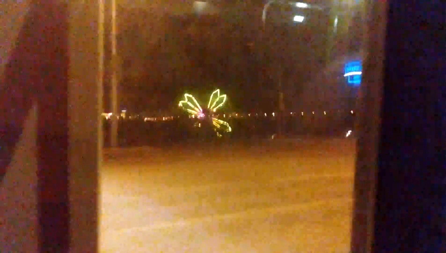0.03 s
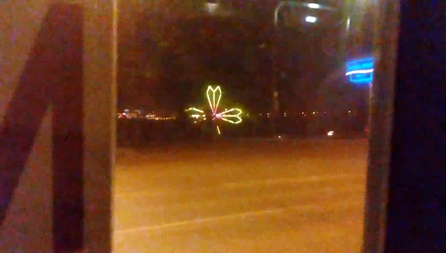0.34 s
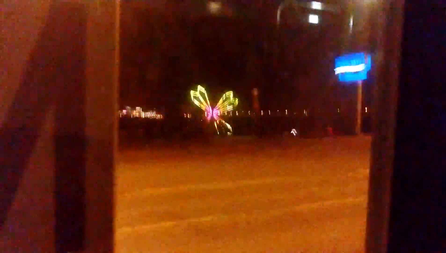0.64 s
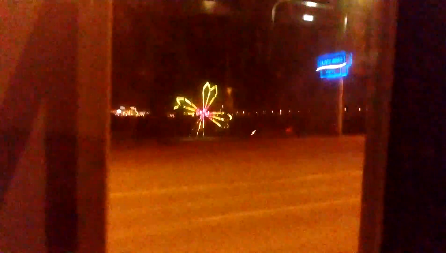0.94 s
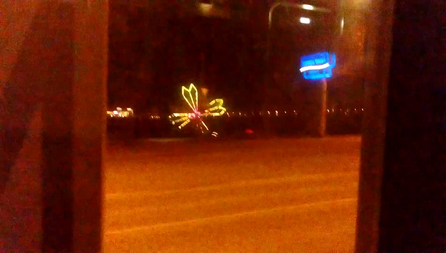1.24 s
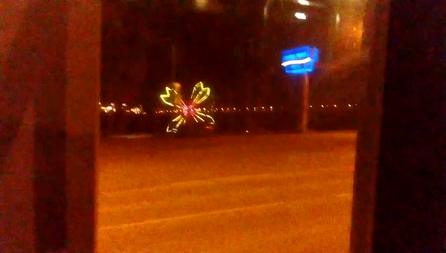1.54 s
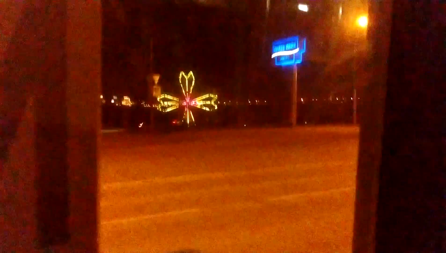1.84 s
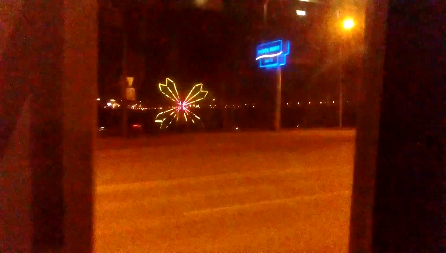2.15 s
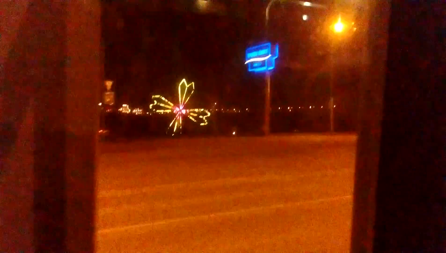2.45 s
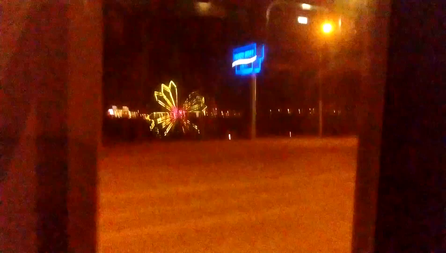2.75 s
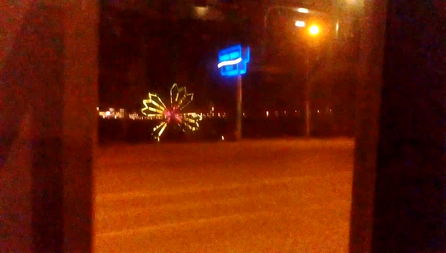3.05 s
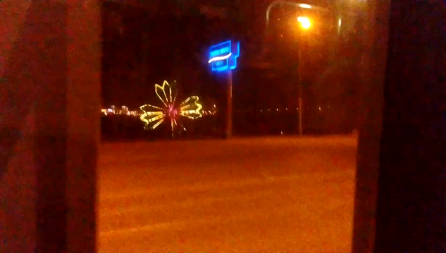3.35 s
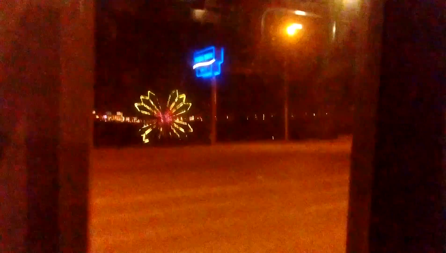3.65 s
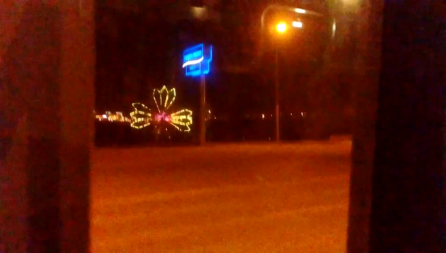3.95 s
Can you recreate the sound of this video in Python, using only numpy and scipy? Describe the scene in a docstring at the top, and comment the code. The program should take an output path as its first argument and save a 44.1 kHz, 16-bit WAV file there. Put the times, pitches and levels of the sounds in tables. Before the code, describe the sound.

Steady low road rumble and engine hum inside a moving bus, with faint rattles.

```python
"""Road rumble inside a bus rolling slowly along a night street, heard in mono from one seat.
The wheels on the uneven surface fill the cabin, which swells in short booms; the engine hums at low,
nearly steady revs. Loose trim clacks and chirps, and a few soft scuffs pass. Behind them sit tyre and
air hiss, a faint high whine and, at the end, a thin squeal. The sound fades in at the start."""
import sys
import numpy as np
from scipy import signal
from scipy.fft import rfft, irfft
from scipy.io import wavfile
from scipy.ndimage import uniform_filter1d

SR = 44100
rng = np.random.default_rng(int(sys.argv[2]) if len(sys.argv) > 2 else 0)


def generate_wav(signal):
    """Clip the signal to [-1, 1] and save it as 16-bit WAV at the path in sys.argv[1]."""
    frames = np.transpose(np.atleast_2d(signal))
    scaled = np.clip(frames, -1, 1) * 32767
    pcm = np.round(scaled).astype(np.int16)
    wavfile.write(sys.argv[1], SR, pcm)


N = 176400
T = np.arange(N) / SR


def road():
    """Rumble of the wheels, shaken by the uneven surface and heard through the cabin."""
    # rumble spectrum at the seat: frequency_hz, relative_db
    tone = [(8, -8), (26, -12), (35, -18), (50, -9), (68, -2), (95, 0), (120, -1.5), (142, -0.5), (185, -6),
            (235, -10.5), (300, -9.5), (340, -13.5), (408, -8.5), (442, -14.5), (465, -12.5), (540, -18.5),
            (600, -17), (720, -19.5), (815, -16), (885, -21.5), (935, -20), (1010, -22.5), (1130, -22.5),
            (1400, -25.5), (2150, -32), (2600, -44), (4000, -66)]
    # rise and fall of the rumble: time_s, gain_db
    swell = [(0.35, 0), (0.58, 1), (0.66, -1), (0.79, 1), (0.84, 0), (0.9, 0.5), (1.42, -0.5),
             (1.68, -0.87), (1.81, 1), (1.92, -0.5), (2.4, 0), (2.76, -1), (2.96, 1), (3.06, -1.2),
             (3.3, 0.5), (3.48, -0.1), (3.76, -1), (4, 0.5)]
    level_db = -25.5 + curve(swell) + 0.5 * wander(rate_hz=50)
    rumble = colour(patchy_noise(patch_db=1.5, frame_samples=512), tone)
    return amp(level_db) * unit(ripple(rumble, depth_db=0.8))


def booms():
    """Low tones of the cabin swell and die away, gliding slightly in pitch."""
    # cabin booms: start_s, length_s, from_hz, to_hz, level_db
    events = [(0.75, 0.5, 138, 135.3, -27.5), (1.356, 0.48, 133, 127.1, -30.5),
              (0.797, 0.48, 88, 93.5, -31), (1.15, 0.4, 73, 68.5, -33.5), (1.696, 0.55, 96, 93.3, -34.5),
              (1.726, 0.2, 145.4, 143, -27.5), (1.77, 0.106, 83.8, 84.5, -25),
              (1.99, 0.75, 106, 109.6, -30.5), (2.7, 0.27, 101.1, 100.4, -31.5),
              (2.948, 0.42, 73.84, 74, -30)]
    out = np.zeros(N)
    for start, length, from_hz, to_hz, db in events:
        progress = np.clip((T - start) / length, 0, 1)
        cycles = np.cumsum(from_hz + (to_hz - from_hz) * progress) / SR + rng.random()
        out += amp(db) * np.sin(np.pi * progress) * np.sqrt(2) * np.sin(2 * np.pi * cycles)
    return out


def engine():
    """The engine hums at multiples of the crankshaft speed, each wavering in strength."""
    # crankshaft speed: time_s, turns_per_s
    speed = [(0, 14.7), (0.7, 14.78), (1.3, 14.72), (1.9, 14.62), (2.4, 14.7), (3.0, 14.8), (4, 14.85)]
    # partials of the hum: cycles_per_turn, level_db
    orders = [(3, -37), (5, -39), (6, -34.5), (7, -42.5), (11, -33), (12, -40), (14, -47.5), (40, -53),
              (54, -52)]
    jitter_turns = 0.0041 * wander(rate_hz=5.2)
    turns = np.cumsum(curve(speed)) / SR + jitter_turns
    hum = np.zeros(N)
    for order, db in orders:
        strength = 1 + 0.27 * wander(rate_hz=5)
        hum += amp(db) * unit(strength * np.sin(2 * np.pi * (order * turns + rng.random())))
    return hum


def rattles():
    """Chirps, scuffs and clacks of loose fittings, coloured by the cabin's resonances."""
    return ripple(chirps() + scuffs() + clacks(), depth_db=1.5)


def clacks():
    """Loose panels knock: sharp when they hit squarely, dull when they bounce."""
    # panel knocks: start_s, level_db, brightness (sharp share of the power, 0-1)
    knocks = [(2.164, -32.5, .9), (2.168, -33, .6), (2.182, -42, .5), (2.194, -34, 0.1),
              (2.202, -32.5, .15), (2.271, -33, 0.54), (2.274, -33.5, 0), (3.502, -32.5, 0.1),
              (3.573, -31, 0.8), (3.575, -34.5, 0.84), (3.589, -39, 0.5)]
    # spectrum of a sharp knock: frequency_hz, relative_db
    sharp_tone = [(500, -25), (1200, 1.5), (2000, 4.5), (2600, -4), (3400, 2), (4500, -5.5), (6400, -2),
                  (7800, -25), (11000, -22), (15000, -31)]
    rise_s, decay_s, wet, dull_cutoff_hz = 0.001, 0.0042, 0.75, 3000
    dull_tone = [(hz, db - 10 * np.log10(1 + (hz / dull_cutoff_hz) ** 4)) for hz, db in sharp_tone]
    shares = [(start, db, np.clip(bright, 0.01, 0.99)) for start, db, bright in knocks]
    sharp = [(start, db + 10 * np.log10(bright), rise_s) for start, db, bright in shares]
    dull = [(start, db + 10 * np.log10(1 - bright), rise_s) for start, db, bright in shares]
    return contacts(sharp, sharp_tone, decay_s, wet) + contacts(dull, dull_tone, decay_s, wet)


def chirps():
    """Trim rubs in a quick run of small, bright chirps."""
    # rubs of the trim: start_s, level_db
    rubs = [(1.713, -46), (1.741, -48), (1.789, -43), (1.801, -50), (1.817, -44.5)]
    # chirp spectrum: frequency_hz, relative_db
    tone = [(2000, -12), (3500, -5), (5500, -6), (6600, 1), (8000, -15.5), (11000, -23), (15000, -28)]
    rise_s = 0.003
    return contacts([(start, db, rise_s) for start, db in rubs], tone, decay_s=0.0066, wet=0.88)


def scuffs():
    """Loose fittings scuff with a soft hiss of friction."""
    # scuffs: start_s, level_db, rise_s
    events = [(0.451, -39.5, 0.0073), (1.936, -42, 0.014), (2.69, -52.5, 0.016), (2.988, -46, 0.0083),
              (3.101, -44, 0.0056), (3.695, -57, .012)]
    # scuff spectrum: frequency_hz, relative_db
    tone = [(1500, -26), (3000, -4), (4500, 7), (6000, 6), (7900, -10), (8850, 2), (9400, -6), (10700, 0.5),
            (11600, -4), (13000, -1), (15400, -4)]
    return contacts(events, tone, decay_s=0.018, wet=0.4)


def hiss():
    """Tyre and air hiss that swells gently and flickers."""
    # hiss spectrum at the seat: frequency_hz, relative_db
    tone = [(1500, -0.5), (2600, -1.5), (2900, 3.5), (3450, 6.5), (4000, 0), (6500, -2), (7200, -11),
            (7800, -17.5), (10500, -15.5), (12000, -13.5), (13000, -10), (14300, -14.5), (15400, -22)]
    # rise and fall of the hiss: time_s, gain_db
    swell = [(0.3, 4), (0.45, 1.5), (0.6, -0.5), (0.88, 2), (1.05, -1), (1.5, -1), (1.85, 0.5), (2.35, -1),
             (2.62, -2), (2.9, -2.5), (3.4, 0), (3.85, -1), (4, -3.5)]
    level_db = -51 + curve(swell) + 0.92 * wander(rate_hz=27)
    air = colour(patchy_noise(patch_db=1.8, frame_samples=256), tone)
    return amp(level_db) * unit(ripple(air, depth_db=-0.1))


def whine():
    """Thin high tones, unsteady in strength and phase, ride on the rumble."""
    # tones of the whine: pitch_hz, level_db
    partials = [(2832, -65), (2912, -70.5), (3397, -60), (4818, -78), (5017, -70), (6605, -77)]
    # rise and fall of the whole whine: time_s, gain_db
    swell = [(0.35, 1), (1.15, -2.5), (1.4, 2), (2.7, -1.5), (3.45, -2.5), (3.7, 1), (4, 2.5)]
    tones = np.zeros(N)
    for hz, db in partials:
        strength = 1 + 0.3 * wander(rate_hz=25)
        tones += amp(db) * unit(strength * np.sin(2 * np.pi * hz * T + wander(rate_hz=8.9)))
    return amp(curve(swell)) * tones


def squeal():
    """A brief, faint, wavering tone, perhaps from a brake."""
    # the squeal: start_s, length_s, pitch_hz, level_db
    event = (3.88, 0.18, 5470, -59)
    start, length, hz, db = event
    envelope = np.sin(np.pi * np.clip((T - start) / length, 0, 1))
    return amp(db) * envelope * np.sin(2 * np.pi * hz * T + wander(rate_hz=60))


def contacts(events, tone, decay_s, wet):
    """Each contact (start_s, level_db, rise_s) is a burst of friction that rises, dies and echoes."""
    power = np.zeros(N)
    for start, db, rise in events:
        attack = np.clip((T - start) / rise, 0, 1)
        decay = np.exp(-np.maximum(T - start - rise, 0) / decay_s)
        power += (amp(db) * attack * decay) ** 2
    friction = unit(colour(rng.standard_normal(N), tone))
    return cabin(np.sqrt(power) * friction, wet)


def cabin(x, wet, t60_s=0.2):
    """Adds the short, dense echo of the cabin."""
    t = T[:SR // 2]
    tail = rng.standard_normal(len(t)) * amp(-60 * t / t60_s)
    return x + wet * signal.fftconvolve(x, tail / np.linalg.norm(tail))[:N]


def ripple(x, depth_db, spacing_hz=45.02):
    """The many close resonances of the cabin: steady narrow peaks and dips."""
    hz = np.fft.rfftfreq(N, 1 / SR)
    heights = rng.standard_normal(2048)
    gain_db = depth_db * np.interp(hz / spacing_hz, np.arange(len(heights)), heights)
    return irfft(rfft(x) * amp(gain_db), N)


def patchy_noise(patch_db, frame_samples):
    """White noise whose level drifts in patches of time and frequency."""
    frames = signal.stft(rng.standard_normal(N), nperseg=frame_samples)[2]
    across_frequency = uniform_filter1d(rng.standard_normal(frames.shape), size=6, axis=0)
    patches = unit(uniform_filter1d(across_frequency, size=7, axis=1))
    return signal.istft(frames * amp(patch_db * patches), nperseg=frame_samples)[1][:N]


def colour(x, points):
    """Filters x by a spectrum (frequency_hz, relative_db) that falls away above its last point."""
    hz = np.fft.rfftfreq(2 * N, 1 / SR)
    point_hz, point_db = np.transpose(points)
    gain = amp(np.interp(np.log(hz + 1), np.log(point_hz + 1), point_db))
    gain /= np.maximum(hz / point_hz[-1], 1) ** 2  # 12 dB per octave
    return irfft(rfft(x, 2 * N) * gain)[:N]


def wander(rate_hz):
    """Random motion of rms 1, mostly slower than rate_hz."""
    hz = np.fft.rfftfreq(N, 1 / SR)
    lowpass = (hz > 0) / (1 + (hz / rate_hz) ** 2) ** 2
    return unit(irfft(rfft(rng.standard_normal(N)) * lowpass, N))


def curve(points):
    """Joins points (time_s, value) into a control curve at every sample."""
    return np.interp(T, *np.transpose(points))


def amp(db):
    """Decibels to gain."""
    return 10 ** (np.asarray(db) / 20)


def unit(x):
    """Scales to rms 1."""
    return x / np.sqrt(np.mean(x ** 2) + 1e-20)


def scene():
    """Everything as it reaches one microphone at a seat."""
    return (engine() + whine() + road() + hiss() + booms() + rattles() + squeal())[None]


def record(dry):
    """The microphone signal fades in, and the treble is cut above 15.5 kHz."""
    # opening fade: time_s, gain_db
    fade = [(0.12, -110), (0.135, -62), (0.16, -51), (0.2, -30.5), (0.26, -15.5), (0.31, -7.5), (0.335, 1)]
    lowpass = signal.firwin(511, 15500, window=("kaiser", 9), fs=SR)
    return signal.oaconvolve(dry * amp(curve(fade)), lowpass[None], "same")


dry = scene()
out = record(dry)
generate_wav(out)
```